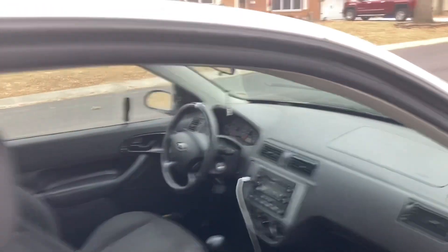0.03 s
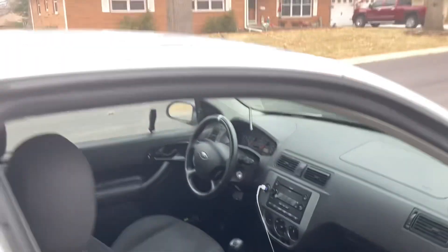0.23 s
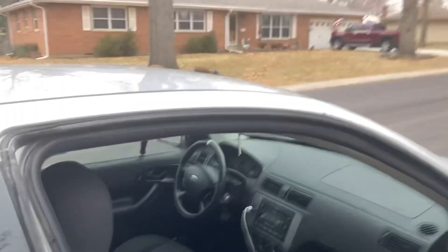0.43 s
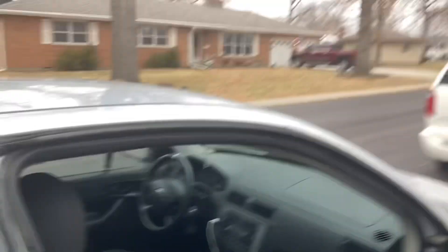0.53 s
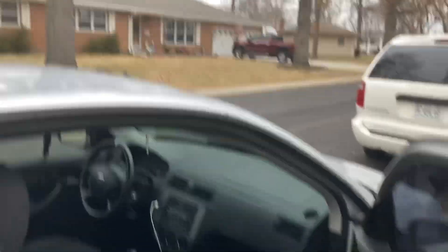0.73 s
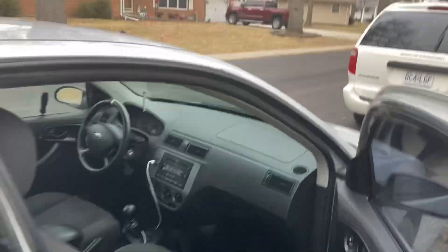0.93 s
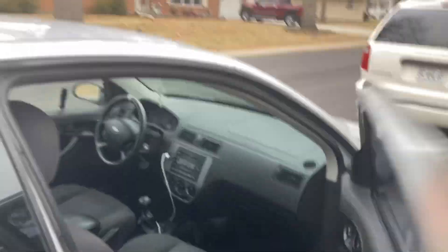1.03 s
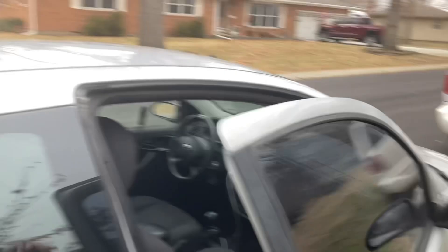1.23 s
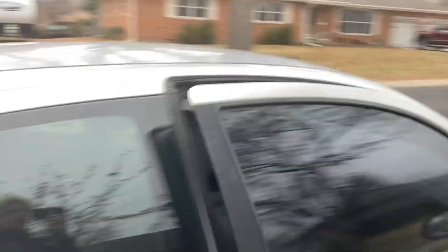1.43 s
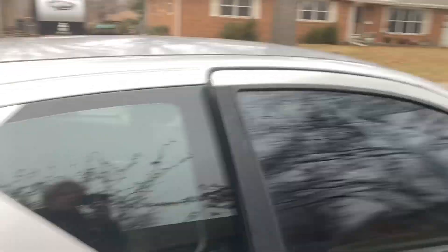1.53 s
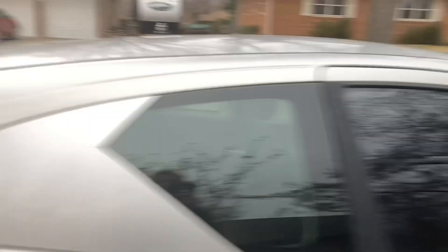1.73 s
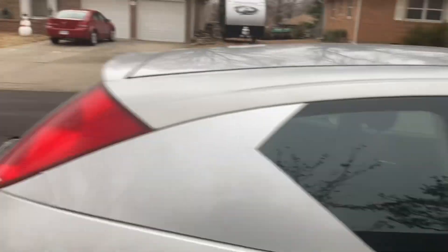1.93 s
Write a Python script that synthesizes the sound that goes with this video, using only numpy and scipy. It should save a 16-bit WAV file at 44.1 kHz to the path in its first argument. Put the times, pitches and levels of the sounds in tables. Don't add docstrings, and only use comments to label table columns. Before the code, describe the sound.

A car door slams shut close by with a boomy thud, after wind buffeting and shoe scuffs

```python
import sys
import numpy as np
from scipy import signal
from scipy.fft import rfft, irfft, next_fast_len
from scipy.io import wavfile
from scipy.ndimage import uniform_filter1d, map_coordinates

SR = 44100
rng = np.random.default_rng(int(sys.argv[2]) if len(sys.argv) > 2 else 0)


def volts(x):
    e = np.asarray(x, float) / 20
    return 10 ** e


def waveform_to_disk(signal):
    frames = np.transpose(np.atleast_2d(signal))
    scaled = np.clip(frames, -1, 1) * 32767
    samples = np.round(scaled).astype(np.int16)
    wavfile.write(sys.argv[1], SR, samples)


N = 88200
TIME = np.arange(N) / SR
LOW_SIDE = .005

# [f/Hz, side over mid/dB]
AIR_WIDTH = [(300, 11.5), (1000, -3), (8000, 3), (15000, -1)]
# [f/Hz, side over mid/dB]
DOOR_WIDTH = [(80, -40), (170, -24), (380, -14), (700, -4), (4400, -5), (8000, -1), (15000, -2)]


def unit(x):
    return x / np.sqrt(np.mean(x ** 2) + 1e-20)


def along(points, hz):
    f, v = np.transpose(points)
    return np.interp(np.log(hz + 1), np.log(f + 1), v)


def over_time(points):
    return np.interp(TIME, *np.transpose(points))


def wobble(rate):
    knots = rng.standard_normal(int(N * rate / SR) + 4)
    return map_coordinates(knots, [TIME * rate])


def filtered(x, response):
    m = next_fast_len(N + 8192)
    return irfft(rfft(x, m) * response(np.fft.rfftfreq(m, 1 / SR)), m)[..., :N]


def noise(spectrum, width):
    def colour(hz):
        return volts(along(spectrum, hz)) * [1 + 0 * hz, volts(along(width, hz))]
    pair = filtered(rng.standard_normal((2, N)), colour)
    return pair / np.sqrt(np.mean(pair[0] ** 2))


def even(pair):
    span = int(.05 * SR)
    power = uniform_filter1d(uniform_filter1d(pair[0] ** 2, span), span // 2)
    return pair / np.sqrt(np.abs(power) + 1e-9)


def burst(s, rise, hold, t60):
    t = TIME - s
    return np.clip(t / rise, 0, 1) ** 2 * volts(-60 * np.clip(t - rise - hold, 0, None) / t60)


def bell(s, width):
    return np.exp(-((TIME - s) / width) ** 2)


def wind():
    # [t/s, strength/dB, turbulence/dB]
    gusts = [(0, -29, -45), (.12, -33, -59), (.2, -28, -50), (.3, -33.5, -56), (.4, -21.5, -43),
             (.5, -21.5, -34), (.65, -22.5, -29), (.8, -24.5, -26.5), (.89, -17, -34),
             (1.031, -19.5, -25.5), (1.099, -19, -35), (1.19, -28, -54), (1.3, -27.5, -44.5),
             (1.387, -21.5, -37), (1.43, -27.5, -44), (1.528, -37, -68), (1.76, -27.5, -37),
             (2, -32, -67.5)]
    # [t/s, peak/dB, brightness/dB]
    puffs = [(0.029, -38, 5), (0.083, -48, 10.5), (0.32, -34.5, -26), (0.368, -52, -6), (0.425, -32.5, -6),
             (.467, -47, -9), (0.488, -27.5, -6), (.518, -44, -10), (0.543, -32.5, -11), (.579, -25, 1),
             (0.613, -26, -1), (.649, -30.5, -14), (0.682, -33, -2), (0.703, -25, 4.5), (0.733, -31.5, 1),
             (.757, -25, -0.5), (0.797, -31.5, 5), (.821, -29, 9.5), (.832, -23, 7), (0.844, -19.5, 6.5),
             (0.865, -24, 0), (0.894, -34, -8), (0.915, -34, -5), (.936, -26, 5), (0.96, -23, -4),
             (0.986, -26.5, 2), (1.002, -23.5, -2), (1.037, -22.5, -3), (1.072, -17, 1), (1.111, -31, -3),
             (1.158, -32, -18), (1.224, -29.5, -15), (1.247, -30, -23), (1.274, -35, -12),
             (1.301, -30, -0.5), (1.344, -55, -7), (1.384, -24.5, -1), (1.973, -40.5, -8),
             (1.992, -51, 12.5)]
    # [t/s, peak/dB, f/Hz, width/s]
    rolls = [(0.041, -24.5, 104, 0.012), (0.1917, -24, 53.3, 0.028), (0.387, -17, 81, 0.015),
             (0.4882, -21, 72.8, 0.047), (0.5105, -18, 56, 0.051), (0.5382, -23, 89.5, 0.0217),
             (0.599, -13.5, 134.7, 0.0048), (0.6275, -21.5, 133, 0.0142), (0.7462, -32, 73, 0.023),
             (0.7766, -20.5, 90, 0.0204), (0.8743, -21, 52.5, 0.042), (0.8791, -14, 71, 0.02),
             (0.9273, -15, 99, 0.01), (0.9437, -14.6, 170, 0.0061), (0.9584, -13.5, 181, 0.0084),
             (0.9621, -10.5, 78, 0.0078), (0.9944, -19, 88, 0.017), (1.0242, -8.5, 121, 0.0079),
             (1.048, -17.4, 63.4, 0.028), (1.052, -17.6, 119, 0.012), (1.0739, -12.0, 101, 0.0069),
             (1.1327, -23, 83, 0.029), (1.2538, -24.5, 74, 0.03), (1.332, -24, 58, 0.024),
             (1.3893, -14.5, 121, 0.004), (1.9249, -25.5, 66, 0.035)]
    # [f/Hz, level/dB]
    rumble_colour = [(20, -47), (35, -7.5), (55, 2.5), (100, 0), (160, -7.5), (300, -20.5), (600, -87),
                     (1300, -120)]
    # [f/Hz, level/dB]
    flutter_colour = [(90, -17.5), (200, 4.5), (400, -2), (800, -20), (1500, -43.5), (3000, -79),
                      (6000, -120)]
    # [f/Hz, level/dB]
    puff_colour = [(150, -6), (350, 4), (750, 0), (1250, -14), (2000, -34), (4000, -52), (9000, -120)]
    # [f/Hz, side over mid/dB]
    port_width = [(60, -44), (130, -49), (290, -41), (640, -2), (1410, -1.5), (3100, 9), (6820, -26),
                  (15000, 24)]

    s, strength, turbulence = np.transpose(gusts)
    rumble_db = -2.5 + np.interp(TIME, s, strength) + 1.42 * wobble(11.77)
    flutter_db = -0.5 + np.interp(TIME, s, turbulence) + 0.41 * wobble(44.5)
    rumble = volts(rumble_db) * even(noise(rumble_colour, port_width))
    flutter = volts(flutter_db) * even(noise(flutter_colour, port_width))

    puff_s, low_db, bright_db = 0.0067, 2, -9
    low, bright, swings = np.zeros((3, N))
    for s, db, brightness_db in puffs:
        shape = bell(s + puff_s / 2, puff_s)
        low += volts(low_db + db) * shape
        bright += volts(bright_db + db + brightness_db) * shape
    for s, db, hz, width in rolls:
        swings += volts(db) * bell(s, width) * np.cos(2 * np.pi * hz * (TIME - s))

    bright_puffs = bright * even(noise(puff_colour, port_width))
    low_puffs = low * even(noise(flutter_colour, port_width))
    return rumble + flutter + bright_puffs + low_puffs + swings * [[1], [LOW_SIDE]]


def street():
    # [t/s, level/dB]
    hiss_level = [(0, -55.5), (.9, -58.5), (1.27, -54), (1.31, -61), (1.6, -56), (2, -59.5)]
    # [f/Hz, level/dB]
    hiss_colour = [(200, -44), (600, 3), (1500, 1), (3500, -9), (7000, -4.5), (11000, 0), (15000, -11),
                   (17500, -69)]
    return volts(over_time(hiss_level)) * noise(hiss_colour, AIR_WIDTH)


def shoe():
    # [t/s, rise/s, hold/s, t60/s]
    scuff_shapes = [
        (0.0, .002, .01, .06),
        (.2118, .0005, .006, .03),
        (.2205, .001, .008, .038),
        (1.15, .07, .055, .05),
        (.53, .025, .015, .12),
    ]
    scuff_levels = [-80, -39, -35, -55.5, -61]
    # [f/Hz, level/dB]
    grit_colour = [(500, -6), (900, 1.5), (1300, 9), (2450, 5.5), (4300, 8), (6000, -3), (11500, 3.5),
                   (16500, -20)]
    # [t/s, level/dB]
    rustle_level = [(0, -90), (.1, -60), (.3, -58.5), (.55, -53.5), (.75, -63.5), (1.1, -65), (1.27, -78),
                    (1.32, -70)]
    # [f/Hz, level/dB]
    weave_colour = [(600, -11.5), (1300, -9.5), (2200, -10), (4500, -12), (7000, -24), (12000, -67)]
    # [t/s, level/dB, f/Hz]
    drag_path = [(.232, -45.5, 921), (.246, -51.5, 1001), (0.284, -51, 1450), (0.326, -59.5, 1816),
                 (.43, -62, 1753), (.6, -76, 1620)]
    # [t/s, rise/s, hold/s, t60/s, level/dB, f/Hz]
    upper_hollow = (.25, .01, .03, .09, -56, 2100)

    grit = volts(1.1 * wobble(1000)) * noise(grit_colour, [(500, -15), (3000, -3), (10000, 9.5)])
    scuffs = sum(volts(db) * burst(*shape) for db, shape in zip(scuff_levels, scuff_shapes)) * grit
    cloth = volts(over_time(rustle_level) + 0.44 * wobble(38.8)) * noise(weave_colour, AIR_WIDTH)

    width_hz = 330
    slow = filtered(rng.standard_normal((2, N)), lambda f: 1 / (1 + (f / width_hz * 2) ** 2))
    s, db, hz = np.transpose(drag_path)
    carrier = np.cos(2 * np.pi * np.cumsum(np.interp(TIME, s, hz)) / SR)
    drag_db = np.interp(TIME, s, db, -120, -120) + 1.4 * wobble(50.4)
    drag = volts(drag_db) * unit(slow * carrier)

    *shape, upper_db, upper_hz = upper_hollow
    upper_band = unit(slow[:, ::-1] * np.cos(2 * np.pi * upper_hz * TIME))
    upper = volts(upper_db) * burst(*shape) * upper_band
    return scuffs + cloth + (drag + upper) * [[1], [.6]]


def catch():
    # [t/s, rise/s]
    contact_onsets = [
        (1.545, .035),
        (1.5832, .0005),
        (1.596, .0005),
        (1.6278, .001),
        (1.636, .001),
        (1.66, .02),
        (1.703, .001),
        (1.7404, .001),
    ]
    # [level/dB, hold/s, t60/s, brightness edge f/Hz]
    contact_bodies = [(-31.5, 0.0046, 0.028, 3450), (-11.5, 0.0081, 0.14, 4000), (-11, 0.0012, 0.06, 11400),
                      (-9, 0.005, 0.019, 14100), (-35, 0.0058, 0.19, 14700), (-49.5, 0.018, 1, 12600),
                      (-46, 0.0028, 0.072, 11000), (-43.5, .003, 0.037, 3800)]
    # [f/Hz, level/dB]
    clatter_colour = [(400, -12), (850, -10), (1500, -16), (2500, -15), (4400, -11.5), (6000, -18),
                      (11000, -15.5), (16500, -24)]
    # [f/Hz, width/Hz, level/dB]
    steel_modes = [(795, 330, 10), (1524, 120, 6.5), (1834, 145, -1), (2390, 16, -12), (3230, 28, -14),
                   (4430, 160, -19.5), (7540, 1060, -17.5), (12600, 1000, 3.5)]

    def steel(f):
        ringing = sum(volts(db) * 1j * f * w / (c * c - f * f + 1j * f * w) for c, w, db in steel_modes)
        return 1 + ringing

    def contact_band(f, edge_hz):
        bottom_hz = edge_hz / 10
        return 1 / (1 + (f / edge_hz) ** 8) / (1 + (bottom_hz / (f + 1)) ** 4)

    rattle = volts(1.5 * wobble(1100)) * noise(clatter_colour, DOOR_WIDTH)
    hits = np.zeros((2, N))
    for (s, rise), (db, hold, t60, edge_hz) in zip(contact_onsets, contact_bodies):
        band = filtered(rattle, lambda f: contact_band(f, edge_hz))
        hits += volts(db) * burst(s, rise, hold, t60) * band
    return filtered(hits, steel) / 2


def panels():
    # [t/s, level/dB, f/Hz, t60/s, direction and share: outward + or inward -]
    panel_blows = [(1.5848, -12.5, 873.9, 0.1, -1), (1.598, -23, 1518, 0.055, 1),
                   (1.602, -20.6, 185.9, 0.54, 1), (1.602, -11.6, 316.2, 0.141, -1),
                   (1.608, -13.3, 133.3, 0.431, -1), (1.6117, -7.3, 239.3, 0.106, -1),
                   (1.6124, -9.8, 65.7, 0.274, 1), (1.6246, -9.6, 59.9, 0.476, -1),
                   (1.6294, -18, 4340, 0.03, 1), (1.6322, -3.2, 343.9, 0.057, 1),
                   (1.6384, -13.5, 96.2, 0.201, 1), (1.6431, -8.3, 73.2, 0.182, -1),
                   (1.6554, -0.4, 207.7, 0.015, -1), (1.671, -23.4, 52.3, 0.6, 1),
                   (1.6793, -13.4, 297.7, 0.027, -1), (1.6819, -22.1, 216.1, 0.222, -1),
                   (1.684, -28.0, 387.7, 0.21, 1), (1.6961, -14.1, 103.3, 0.389, -1),
                   (1.6986, -21.6, 146.8, 0.26, 1), (1.7286, -15.6, 154.7, 0.033, 1),
                   (1.573, -10.5, 102, 0.03, 0.88),
        (1.5967, -10.5, 851, 0.042, 0.98),
        (1.6455, -13, 422.5, 0.093, -1),
    ]
    # [f/Hz, level/dB]
    tail_colour = [(40, -19), (100, -14), (300, 1), (500, 2), (1000, -10), (2000, -29.5), (8000, -73),
                   (15000, -44)]
    # [f/Hz, t60/s]
    tail_decay = [(60, 0.53), (200, 0.68), (500, 0.16), (2000, 0.39), (10000, .25)]

    ring = np.zeros(N)
    for s, db, hz, t60, way in panel_blows:
        t = np.clip(TIME - s, 0, None)
        rise = 1 - np.exp(-t / .0006)
        ring += way * volts(db - 60 * t / t60) * rise * np.sin(2 * np.pi * hz * t)

    tail_s, tail_db = 1.63, -22
    hz, s, z = signal.stft(noise(tail_colour, DOOR_WIDTH), SR, nperseg=512)
    late = np.clip(s - tail_s, 0, None)
    z = z * np.clip(late / 0.003, 0, 1) * volts(-60 * late / along(tail_decay, hz)[:, None])
    tail = volts(tail_db) * signal.istft(z, SR, nperseg=512)[1][:, :N]
    return ring * [[1], [LOW_SIDE]] + tail


def left_right(pair):
    return np.array([pair[0] + pair[1], pair[0] - pair[1]])


def scene():
    # [f/Hz, left over right/dB]
    door_lean = [(400, 0), (1300, 1.6), (4400, 2.2), (8000, 0)]
    door = left_right(catch() + panels())
    door = filtered(door, lambda f: volts(np.outer([.5, -.5], along(door_lean, f))))
    return door + left_right(wind() + street() + shoe())


def top_cut(x):
    return signal.sosfilt(signal.butter(12, 17140, fs=SR, output="sos"), x)


def record(dry):
    shared_from_hz, in_step_hz, turn_hz, top_hz = 6300, 7004, 4260, 16300
    dwell, ceiling = .85, 1.05

    def share(f):
        return 1 / (1 + (shared_from_hz / (f + 1)) ** 16)

    def lag(f):
        phase = np.pi * (f - in_step_hz) / turn_hz
        return np.exp(1j * np.outer([-1, 1], phase - dwell * np.sin(4 * phase) / 4))

    separate = filtered(dry, lambda f: 1 - share(f))
    shared = filtered(dry[0], lambda f: share(f) * lag(f) / (1 + (f / top_hz) ** 40))
    heard = separate + shared
    heard = heard / (1 + np.abs(heard / ceiling) ** 6) ** (1 / 6)
    return top_cut(heard)


dry = scene()
out = record(dry)
waveform_to_disk(out)
```